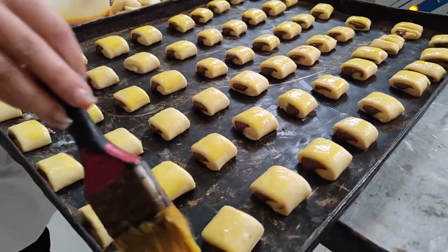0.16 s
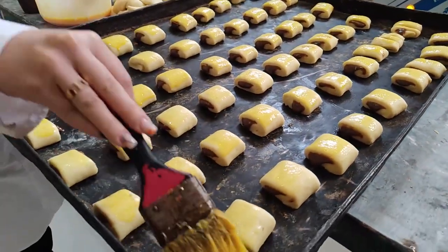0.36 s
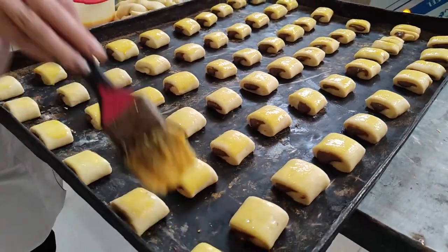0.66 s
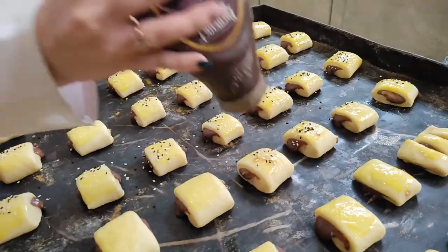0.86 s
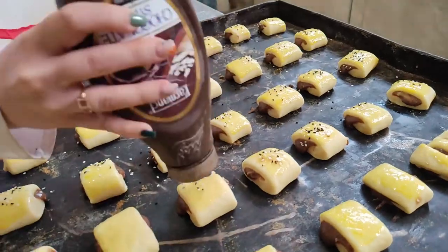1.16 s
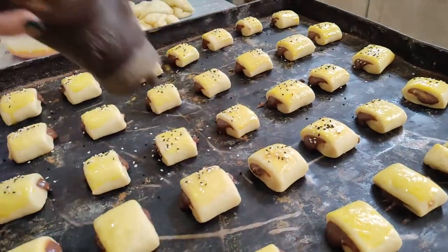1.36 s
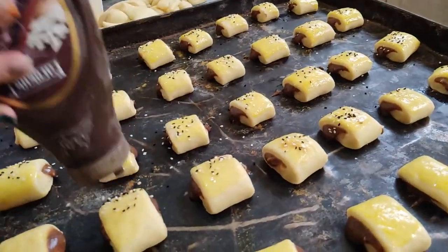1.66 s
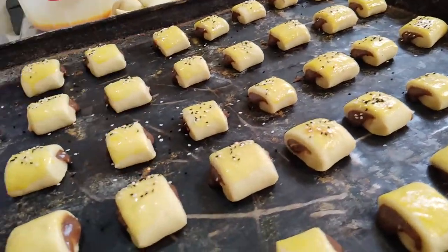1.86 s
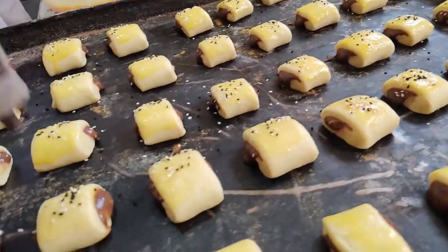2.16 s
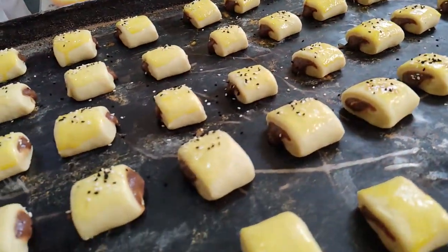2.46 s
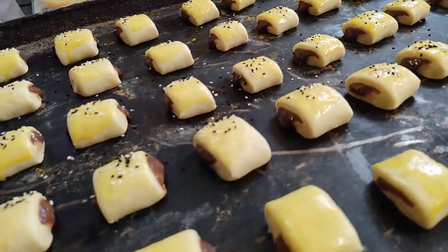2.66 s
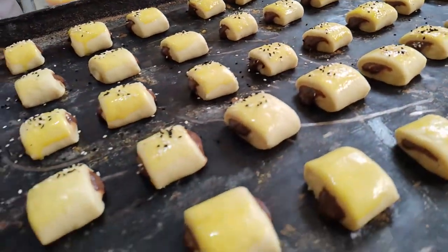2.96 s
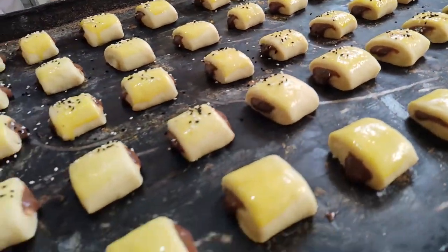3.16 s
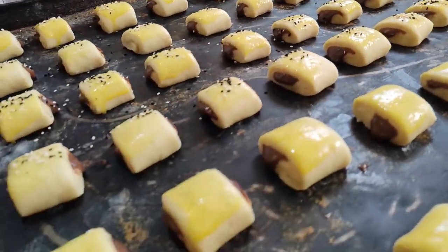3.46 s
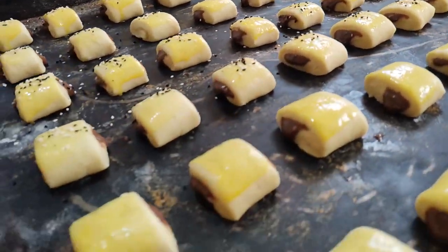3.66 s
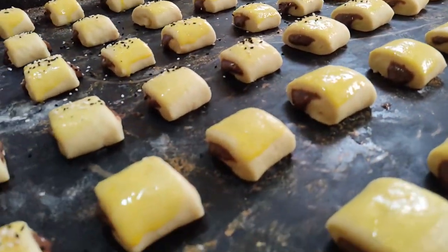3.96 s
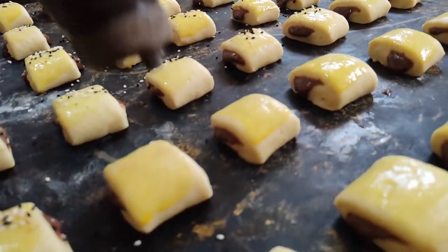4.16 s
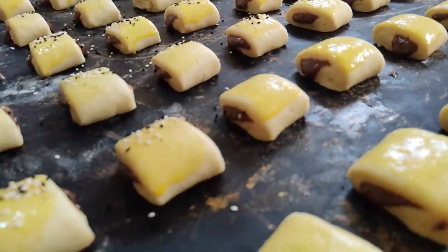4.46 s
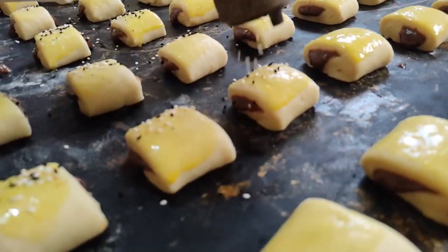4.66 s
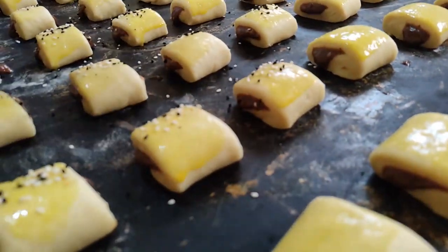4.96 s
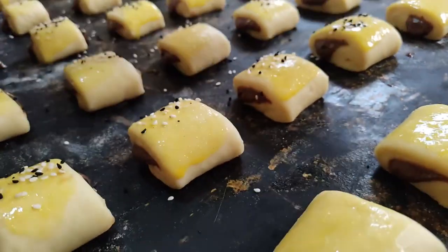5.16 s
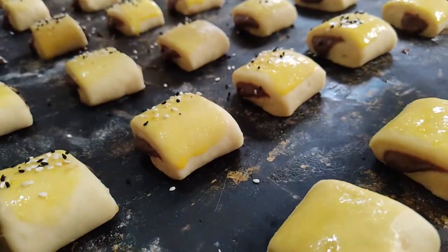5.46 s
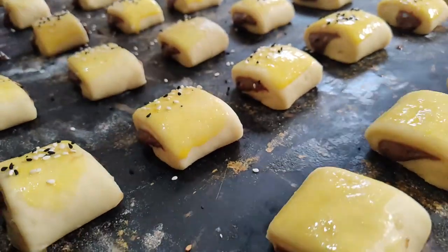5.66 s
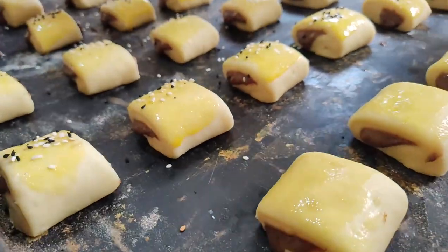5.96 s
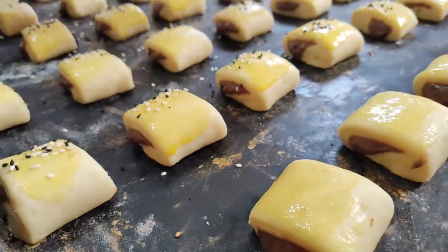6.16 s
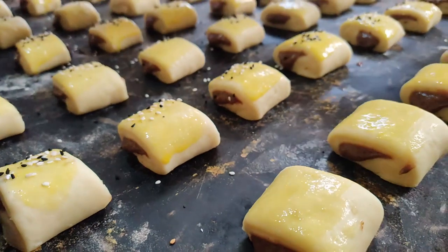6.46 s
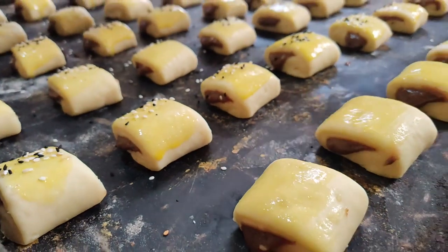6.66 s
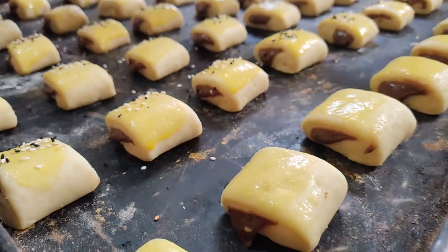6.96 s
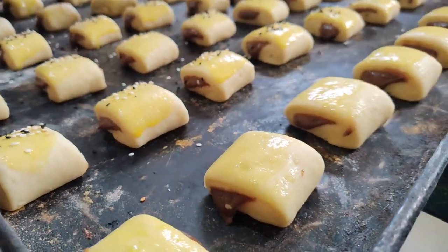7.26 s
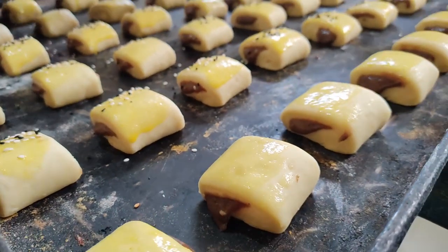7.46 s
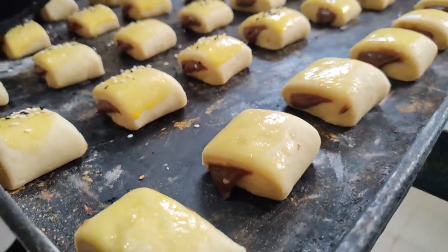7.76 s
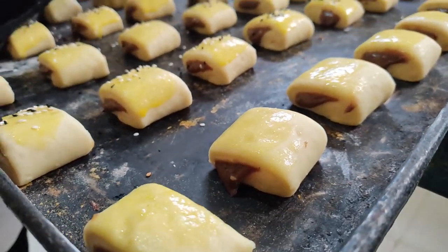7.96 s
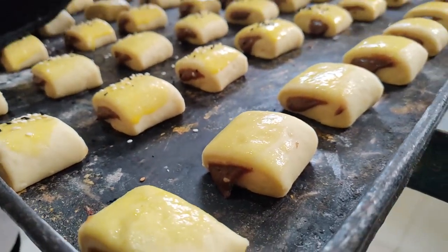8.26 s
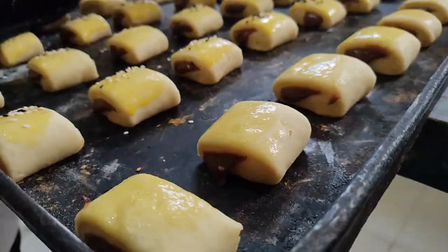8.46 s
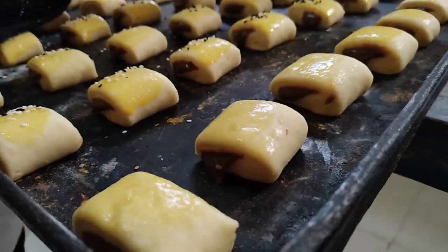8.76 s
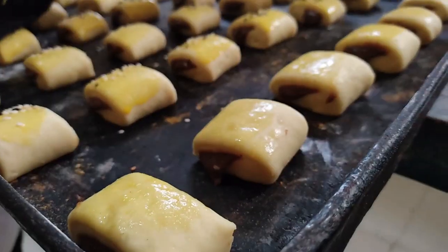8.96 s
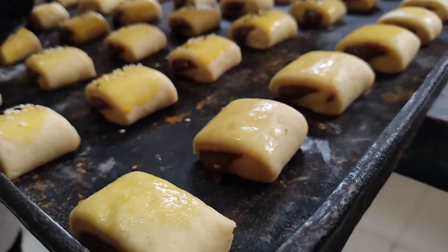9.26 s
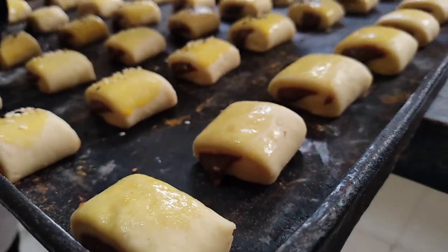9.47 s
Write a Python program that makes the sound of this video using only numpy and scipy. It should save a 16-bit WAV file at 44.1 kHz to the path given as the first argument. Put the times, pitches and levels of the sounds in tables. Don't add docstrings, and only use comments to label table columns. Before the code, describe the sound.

In a hard-surfaced bakery kitchen, fans and ovens hum quietly. A soft tap with a brief metallic tray ring opens, then another dry tap before a second has passed. A plastic jar of fine seeds is then shaken close to the stereo microphone, about twice a second, each shake a sharp hiss-like rattle against the lid followed by a fuller pour back. It is strongest early, then gets fainter.

```python
import sys
import numpy as np
from scipy import signal
from scipy.io import wavfile
from scipy.ndimage import uniform_filter1d

SR = 44100
rng = np.random.default_rng(int(sys.argv[2]) if len(sys.argv) > 2 else 0)


def digitize_waveform(pressure):
    field = np.atleast_2d(pressure).T
    bounded = np.clip(field, -1, 1)
    quanta = np.round(bounded * 32767).astype(np.int16)
    wavfile.write(sys.argv[1], SR, quanta)


def boost(x):
    u = np.asarray(x, float) / 20
    return 10 ** u


N = 423360

# (frequency [Hz], level [dB])
HUM_BEFORE = [(26, -33), (45, -6.5), (134, -22), (242, -0.5), (371, -19), (418, -6.5), (656, -10), (831, -16),
              (914, -15), (2000, -13.5), (2420, -24), (2720, -16.5), (3880, -22.5), (7900, -15.5),
              (13000, -51.5)]
HUM_AFTER = [(26, -13), (45, -4.5), (108, -25.5), (215, 0), (322, -10), (389, -6.5), (530, -9.5), (640, -9),
             (1030, -16.5), (1430, -8.5), (1580, -11.5), (2920, -18.5), (5540, -20.5), (7190, -15.5),
             (13000, -50)]
HUM_BEFORE_DB, HUM_AFTER_DB, CHANGE_S = -61, -60.5, 0.812
# (frequency [Hz], width [Hz], level above the hum [dB])
FANS = [(104.8, 11, 15.5), (127, 11, -5), (168, 33, 8.5), (222, 15, 6), (320, 39, 5), (390.2, 16.8, 11),
        (635.4, 34.4, 12), (891, 57, 8), (1234, 200, 5), (1837, 123, 5.5), (2300, 51, 8)]
# (frequency [Hz], level added to the hum [dB])
HUM_TREBLE = [(8000, 2), (9200, 3), (9800, 0), (11000, 7), (12200, 11.5), (14000, -10)]
# (frequency [Hz], likeness [-1 to 1])
PORT_LIKENESS = [(30, .7), (60, 0.13), (130, 0.97), (290, 0.93), (640, 0.48), (1410, 0.18), (3100, 0.11),
                 (6820, -0.085), (15000, 0.63)]
# (frequency [Hz], left minus right [dB])
HUM_LEAN = [(60, 3.5), (150, 4), (380, 6.0), (950, 1), (2380, -1.5), (5980, -5), (15000, -1.5)]
RUMBLE_DB, RUMBLE_PEAK_S, RUMBLE_WIDTH_S = 2, 1.93, 0.69

# (frequency [Hz], level [dB], decay time t60 [s])
TRAY_MODES = [
    (358, -52, 0.11),
    (2600, -60.5, 0.25),
]
# (time [s], peak level [dB], decay time t60 [s], left minus right [dB])
TAPS = [
    (0.0215, -44.5, 0.16, -5.5),
    (0.814, -45.5, 0.29, -2),
    (4.928, -59, 0.072, -4),
]
# (frequency [Hz], level [dB per Hz])
FIRST_TAP_COLOUR = [(900, -37), (1600, -11), (2600, -9), (4000, -10.5), (5200, -18), (7000, 2), (9000, -16),
                    (12000, -46), (15600, -48)]
LATER_TAP_COLOUR = [(880, -28), (1500, -18), (3100, -22), (3690, -18), (3840, -19), (5150, -20),
                    (8010, -11.5), (12800, -28), (15300, -33), (15800, -64)]

# (frequency [Hz], level [dB per Hz])
RATTLE = [(2350, -47), (4000, -12), (4580, -13), (4960, -6), (5730, -7.5), (7270, 5.5), (8720, 4),
          (9250, -1), (9450, 3), (10700, -29), (11000, -41), (14300, -55), (22000, -120)]
WALL = [(1300, -39), (2000, -17), (2470, -5.5), (2980, 0), (4120, 0), (4950, -7.5), (5400, -7.5),
        (7020, -34), (11900, -120)]
HOLLOW = [(500, -37), (750, -8.5), (900, -6), (1050, 0.5), (1250, -6.5), (1600, -7.5), (2300, -2.5),
          (3000, -36)]
EDGE = [(5590, -52.5), (9500, -22.5), (10700, -1), (11100, -7), (11900, -7.5), (12800, -9), (13800, -13),
        (15750, -12), (16100, -61.5)]
PORT_SHIFT = [1.0023, 0.94]
# (time [s], left minus right [dB])
JAR_LEAN = [(1.2, -2), (1.6, -2), (2.1, 1.5), (2.5, 1), (3.0, 1), (3.8, -0.5), (4.2, -2), (4.7, -3.5),
            (5.1, -5.5), (5.9, -6), (6.4, -3.5), (7.7, -2.5), (9.5, -3)]
# (seeds, wall, hollow, edge [dB])
LAYER_DB = [-0.76, -1.4, -1.6, 2.1]
LAYER_LEAN_DB = [-2, 2.5, 4, -0.5]
TICKS_PER_S, TICK_SPREAD_DB = 9000, 2.0

# (time [s], rattle level [dB], wall, hollow, edge relative to the rattle [dB])
UP_THROWS = [(1.112, -45.5, -10, -9.5, -15), (1.556, -35, -16.5, -14.5, -45), (2.014, -30, -18, -20, -28),
             (2.445, -32.5, -16.5, -17.5, -20.5), (2.894, -35, -17.5, -22, -20),
             (3.321, -34, -17, -22, -18), (3.764, -31.5, -17.5, -19, -21), (4.193, -31.5, -16, -23, -21.5),
             (4.62, -34.1, -16, -19.5, -21.5), (5.05, -38, -11.5, -21, -18), (5.47, -35, -17, -19, -19.5),
             (5.896, -37.5, -19, -26, -18), (6.351, -35.6, -15, -28, -16), (6.764, -40, -21, -23, -17),
             (7.16, -37.5, -16, -33, -17), (7.609, -44.5, -16, -28, -18.5), (8.05, -51, -14.5, -20, -12),
             (8.554, -41, -17.5, -20, -13), (8.96, -37.5, -16.5, -23, -17),
             (9.328, -41.5, -15.5, -35, -16.5)]
# (time [s], length [s], rattle level [dB], wall, hollow relative to the rattle [dB])
DOWN_THROWS = [(1.176, 0.036, -44.5, -9.5, -16.5), (1.628, 0.027, -32, -15.5, -28.5),
               (2.085, 0.032, -28, -11.5, -21), (2.504, 0.047, -30.5, -14.5, -30.5),
               (2.95, 0.051, -30, -14.5, -31.5), (3.369, 0.057, -31.4, -12.5, -36),
               (3.819, 0.035, -26, -11, -19.5), (4.252, 0.028, -29, -9.5, -25),
               (4.67, 0.037, -28.5, -13.5, -28.5), (5.101, 0.044, -33.5, -10, -27),
               (5.53, 0.046, -33.5, -15.5, -27), (5.959, 0.044, -35.5, -12.5, -29),
               (6.415, 0.035, -37, -12, -26.5), (6.813, 0.049, -40.5, -15.5, -27.5),
               (7.227, 0.036, -39.5, -19, -32), (7.658, 0.042, -42.5, -21, -30),
               (8.1, 0.051, -45.5, -18.5, -35), (8.597, 0.053, -39.7, -17.5, -39),
               (9.008, 0.06, -38.5, -16, -36), (9.373, 0.067, -40.4, -19, -38)]
# (seeds, wall, hollow, edge [dB/s])
UP_RISE_DB_PER_S = [426, 390, 1100, 450]
UP_FALL_DB_PER_S = [260, 247, 450, 193]
DOWN_RISE_DB_PER_S = [424, 385, 302, 426]
POUR_DB_PER_S = [-41, 36, 220, -101]
SETTLE_DB_PER_S = [444, 418, 674, 450]
UP_RISE_BEND = 3600
SETTLE_PER_DB = 21
DOWN_EDGE_DB, EDGE_CARRY = -16.5, 0.31
CORNER_S = 0.0078
# (time [s], level [dB], length [s], resonance [Hz])
SLAMS = [(1.535, -53, 0.058, 7240), (2.011, -34, 0.0037, 7000), (2.09, -50, 0.02, 7550),
         (2.438, -36, 0.0056, 7360), (2.516, -40.5, 0.013, 5000), (2.881, -40, 0.006, 7100),
         (3.806, -39, 0.024, 7500), (4.193, -36, 0.0069, 6950), (4.25, -44, 0.028, 2300),
         (4.672, -54, 0.034, 2300), (5.102, -63, .03, 2100), (3.827, -56, .02, 1980),
         (2.961, -53.5, 0.029, 3000), (1.627, -58, .04, 1890), (1.172, -68, 0.075, 1820),
         (4.626, -38.5, 0.0088, 7600), (4.658, -40.5, 0.032, 5150), (5.09, -52, 0.039, 5340),
         (5.109, -42.5, 0.014, 7300), (6.422, -58, 0.011, 7500), (7.674, -67, 0.0077, 7300)]


def evened(x):
    return x / np.sqrt(np.mean(x ** 2) + 1e-20)


def read(points, hz):
    f, value = np.transpose(points)
    return np.interp(np.log(hz + 1), np.log(f + 1), value)


def ring(points, shift=1):
    hz = abs(np.fft.fftfreq(2048, 1 / SR))
    log_gain = np.log(boost(np.maximum(read(points, hz / shift), -70)))
    response = np.fft.ifft(np.exp(np.conj(signal.hilbert(log_gain)))).real[:1024]
    return response / np.linalg.norm(response)


def resonate(x, hz, width_hz):
    turn = np.exp(2j * np.pi * np.cumsum(hz) / SR)
    r = np.exp(-np.pi * width_hz / SR)
    smooth = signal.lfilter([1 - r], [1, -r], x / turn)
    return (turn * smooth).real * np.sqrt((1 + r) / (1 - r))


def hum():
    frames, hz = N // 512 + 5, np.fft.rfftfreq(2048, 1 / SR)
    a, b, c, d, patches = rng.standard_normal((frames, 1025, 5)).T
    patches = uniform_filter1d(uniform_filter1d(patches, size=12, axis=0), size=8, axis=1)
    patches_db = 1.12 * evened(patches)

    same = np.clip(read(PORT_LIKENESS, hz), -1, 1)[:, None]
    left = a + 1j * b
    right = same * left + np.sqrt(1 - same ** 2) * (c + 1j * d)
    fans_db = read(HUM_TREBLE, hz)
    for f, width, db in FANS:
        fans_db = fans_db + db / (1 + (2 * (hz - f) / width) ** 2)
    lean_db = np.outer([.5, -.5], read(HUM_LEAN, hz))[:, :, None]
    z = np.array([left, right]) * boost(lean_db + fans_db[:, None] + patches_db)

    t = np.arange(frames) * 512 / SR
    rumble_db = RUMBLE_DB * np.exp(-((t - RUMBLE_PEAK_S) / RUMBLE_WIDTH_S) ** 2)
    z *= boost(np.outer(1 / (1 + (hz / 400) ** 4), rumble_db))

    def heard(spectrum):
        shaped = z * boost(read(spectrum, hz))[:, None]
        return evened(signal.istft(shaped, nperseg=2048, noverlap=1536)[1][:, :N])

    changed = np.clip((np.arange(N) / SR - CHANGE_S) / .01, 0, 1)
    return (1 - changed) * boost(HUM_BEFORE_DB) * heard(HUM_BEFORE) + changed * boost(HUM_AFTER_DB) * heard(HUM_AFTER)


def whine():
    t = np.arange(SR) / SR
    tone = resonate(rng.standard_normal((2, SR)), 2700 + 0 * t, 44)
    return np.pad(boost(-72) * (t < CHANGE_S) * tone, ((0, 0), (0, N - SR)))


def tray():
    out, t = np.zeros((2, N)), np.arange(SR // 4) / SR
    for (hz, db, t60), s in zip(TRAY_MODES, (.004, TAPS[0][0])):
        at = round(s * SR)
        out[:, at:at + len(t)] += boost(db - 60 * t / t60) * np.sin(2 * np.pi * hz * t)
    return out


def taps():
    out, t = np.zeros((2, N)), np.arange(SR // 4) / SR
    colours = (FIRST_TAP_COLOUR, LATER_TAP_COLOUR, LATER_TAP_COLOUR)
    for (s, peak_db, t60, pan_db), colour in zip(TAPS, colours):
        decay = boost(-60 * t / 0.013) + boost(7.0 - 60 * t / max(t60, .03))
        burst = rng.standard_normal((2, len(t))) * decay
        sound = signal.oaconvolve(burst, ring(colour)[None], axes=1)[:, :len(t)]
        at = round(s * SR)
        out[:, at:at + len(t)] += boost(peak_db - 12.5 + pan_db * np.array([[.5], [-.5]])) * sound
    return out


def rustle():
    t = np.arange(SR) / SR
    hz = 12000 + 0 * t
    noise = resonate(resonate(rng.standard_normal((2, SR)), hz, 4000), hz, 4000)
    envelope = boost(-75) * np.exp(-((t - .63) / .045) ** 2)
    return np.pad(envelope * noise, ((0, 0), (0, N - SR)))


def column(values):
    return np.array(values, float)[:, None]


def throws():
    t, power = np.arange(0, N + 64, 64) / SR, 0
    for (up, up_db, *up_rel), (down, pour, down_db, *down_rel) in zip(UP_THROWS, DOWN_THROWS):
        early = np.maximum(up - t, 0)
        bend_db = UP_RISE_BEND * early ** 2
        lid_db = up_db + column([0, *up_rel]) - column(UP_RISE_DB_PER_S) * early - bend_db
        lid_db = lid_db - column(UP_FALL_DB_PER_S) * np.maximum(t - up, 0)

        edge_db = DOWN_EDGE_DB + EDGE_CARRY * (up_rel[2] + 18)
        progress = np.clip(t - down, 0, pour) - pour / 2
        pour_db = down_db + column([0, *down_rel, edge_db]) + column(POUR_DB_PER_S) * progress
        pour_db = pour_db - column(DOWN_RISE_DB_PER_S) * np.maximum(down - t, 0) - bend_db
        settle = np.maximum(column(SETTLE_DB_PER_S) + SETTLE_PER_DB * (down_db + 35), 100)
        pour_db = pour_db - settle * np.maximum(t - down - pour, 0)
        power = power + boost(2 * lid_db) + boost(2 * pour_db)
    lag = np.exp(-(np.arange(-20, 21) * 64 / SR / CORNER_S) ** 2)
    rounded = abs(signal.oaconvolve(power, lag[None] / lag.sum(), "same"))
    force = boost(column(LAYER_DB)) * np.sqrt(rounded)
    return np.array([np.interp(np.arange(N) / SR, t, f) for f in force])


def swarm():
    struck = rng.random(N) < TICKS_PER_S / SR
    ticks = boost(TICK_SPREAD_DB * np.minimum(rng.exponential(1, N), 4)) * struck
    ticks *= rng.choice([-1., 1.], N)
    spot = (rng.integers(0, 6, N) + np.arange(N) * 12 // SR) % 24
    out = np.zeros((2, N))
    for k in range(24):
        paths = rng.standard_normal((2, 128)) * boost(-60 * np.arange(128) / SR / 0.0054)
        paths /= np.linalg.norm(paths, axis=1, keepdims=True)
        out += signal.oaconvolve((ticks * (spot == k))[None], paths, axes=1)[:, :N]
    return evened(out)


def slams(ticks):
    out = np.zeros((2, N))
    for s, db, length, hz in SLAMS:
        t, at = np.arange(round(6 * length * SR)) / SR, round(s * SR)
        swell = boost(db + 9.0) * np.minimum(t / 0.0027, 1) * np.exp(-t / length)
        landing = swell * ticks[:, at:at + len(t)]
        out[:, at:at + len(t)] += resonate(landing, np.full(len(t), hz), 0.126 * hz)
    return out


def jar():
    t, force = np.arange(N) / SR, throws()
    clumps = boost(0.71 * evened(uniform_filter1d(rng.standard_normal(N), size=300)))
    side = boost(np.outer([.5, -.5], np.interp(t, *np.transpose(JAR_LEAN))))
    side = side / np.sqrt(np.mean(side ** 2, axis=0))
    ticks = swarm() * clumps * side
    lean = boost(np.outer(LAYER_LEAN_DB, [.5, -.5]))[:, :, None]
    drive = force[:, None] * ticks * lean
    out = slams(ticks)
    for layer, colour in zip(drive, (RATTLE, WALL, HOLLOW, EDGE)):
        for port in (0, 1):
            out[port] += signal.oaconvolve(layer[port], ring(colour, PORT_SHIFT[port]))[:N]
    return out


def echoes(t60, count):
    at = 90 + np.arange(count) * 22 + rng.integers(0, 22, count)
    response = np.zeros(at[-1] + 1)
    response[at] = rng.choice([-1., 1.], count) * boost(-60 * at / SR / t60)
    return response / np.linalg.norm(response)


def scene():
    background = hum() + whine() + tray() + taps() + rustle()
    seeds = jar()
    room = np.array([signal.oaconvolve(port, echoes(0.13, count=600))[:N] for port in seeds])
    return background + seeds + boost(-8.5) * room


def band_limit(x):
    return signal.sosfilt(signal.butter(12, 15760, fs=SR, output="sos"), x)


def record(dry):
    return band_limit(dry)


dry = scene()
out = record(dry)
digitize_waveform(out)
```